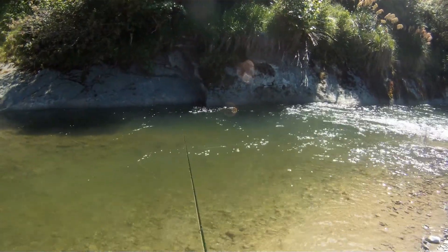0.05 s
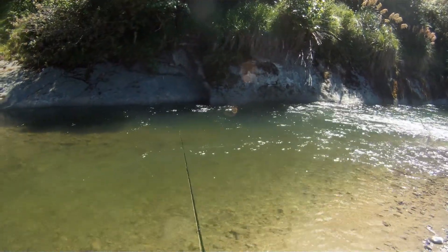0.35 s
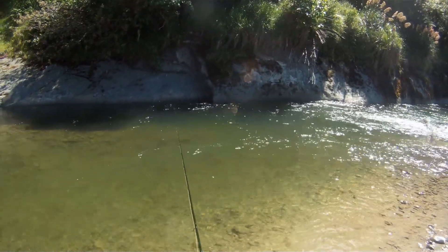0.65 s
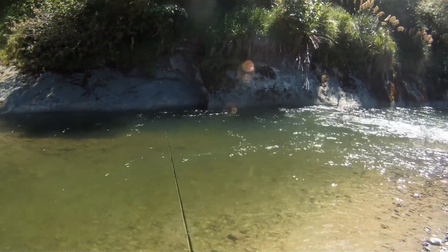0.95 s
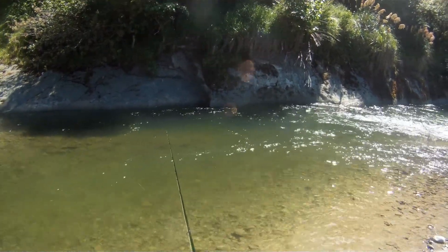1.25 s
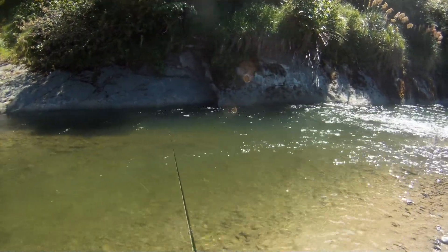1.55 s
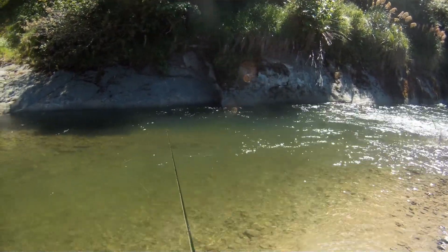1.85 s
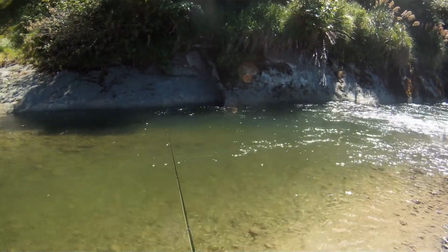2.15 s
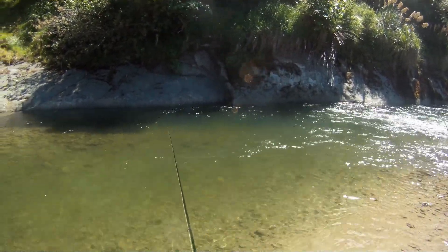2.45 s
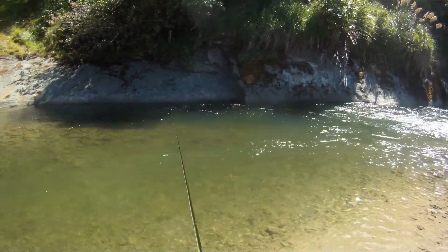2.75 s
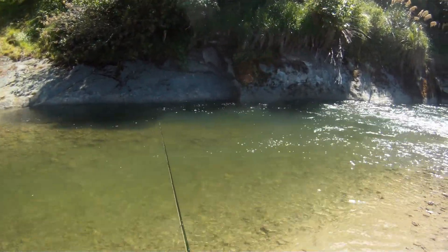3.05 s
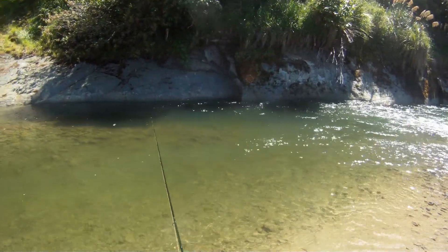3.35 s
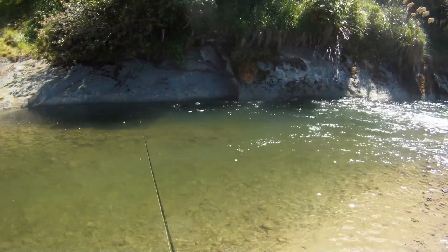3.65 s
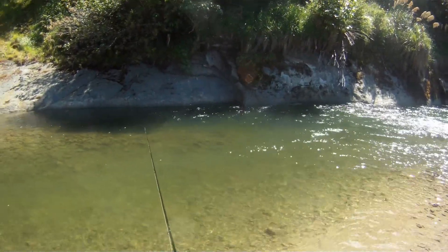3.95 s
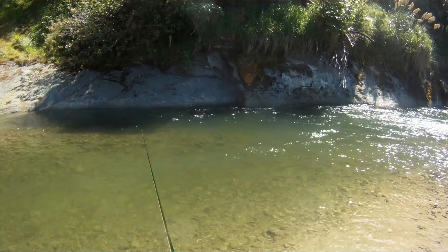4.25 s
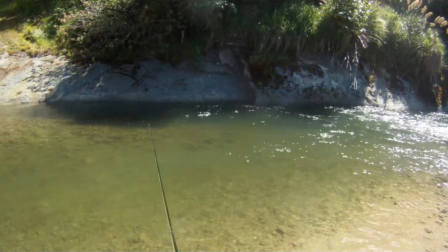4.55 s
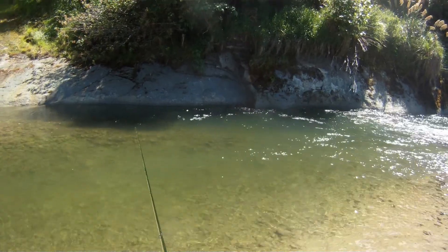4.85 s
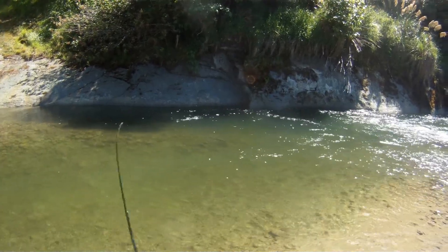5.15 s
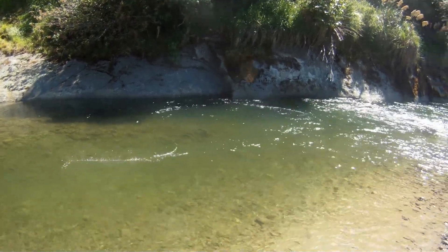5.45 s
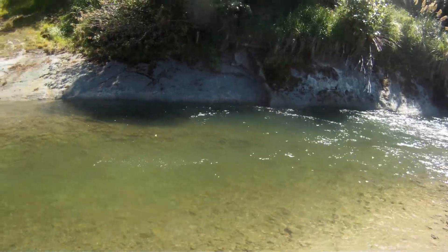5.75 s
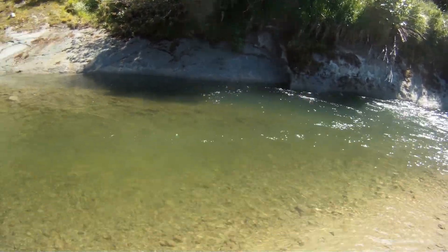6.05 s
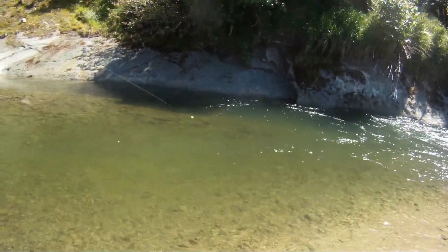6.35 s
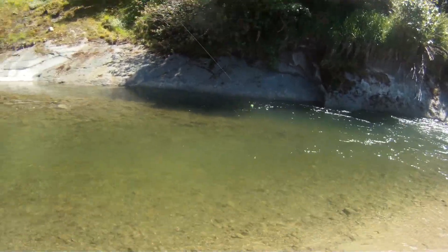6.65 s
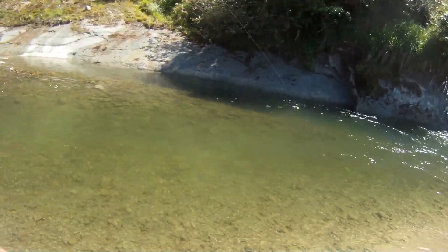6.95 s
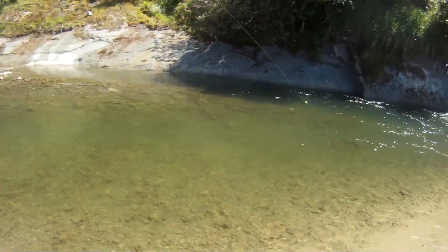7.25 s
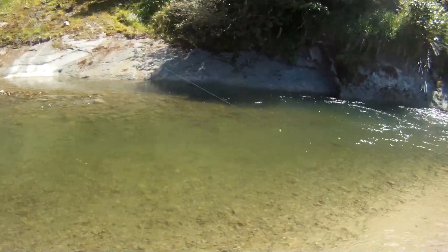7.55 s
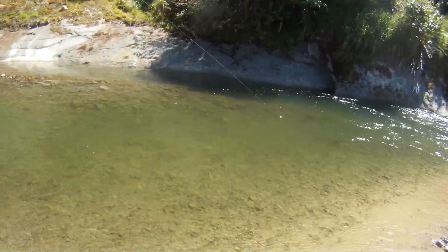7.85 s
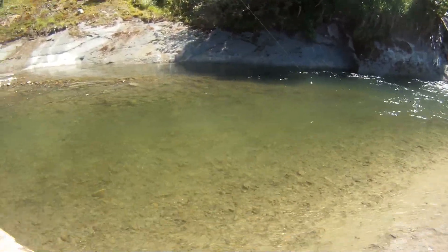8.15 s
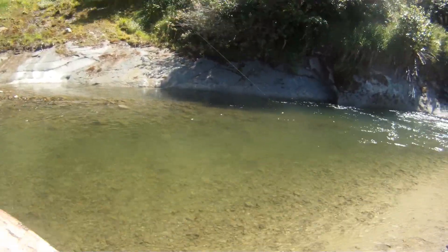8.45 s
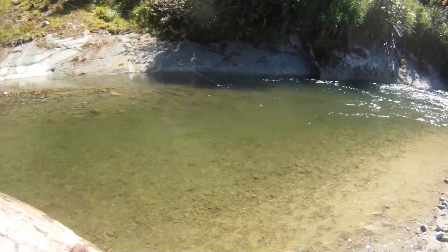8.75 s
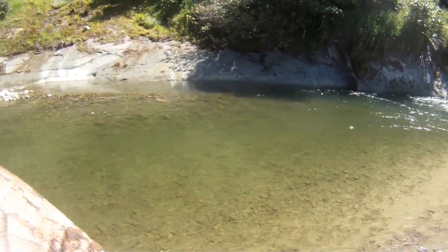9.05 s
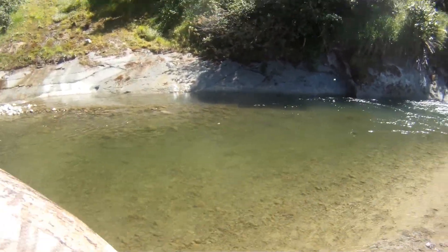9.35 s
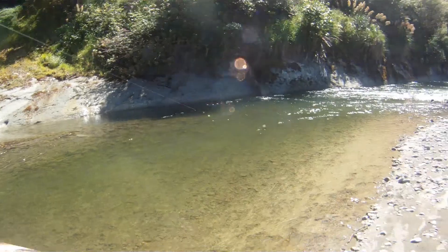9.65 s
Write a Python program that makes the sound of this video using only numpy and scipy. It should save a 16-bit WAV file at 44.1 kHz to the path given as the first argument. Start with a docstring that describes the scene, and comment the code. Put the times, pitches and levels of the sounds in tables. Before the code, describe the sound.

A river rushes faintly and steadily, with a few lone ticks, heard through a small camera strapped to an angler. About halfway through, a fishing line swishes softly and lands with a tiny plip. Steps along the gravel bank follow, shaking the mount: close plastic knocks and rattles, strap rubbing and deep thumps stand out over light crunches of grit. The treble has a thin, slightly gritty edge.

```python
"""A river rushes faintly, with a few lone ticks, heard through a small camera strapped to an angler.
The angler shifts stance, then casts: the line swishes through the air and lands with a tiny plip.
Wading steps along the gravel bank follow. They shake the camera's mount, whose plastic parts knock
and rub, and grit crunches underfoot. The camera samples the sound coarsely and holds each sample,
which gives every sound a thin mirror image in the treble."""
import sys
import numpy as np
from scipy import signal
from scipy.fft import rfft, irfft
from scipy.io import wavfile
from scipy.ndimage import uniform_filter1d

SR = 44100
rng = np.random.default_rng(int(sys.argv[2]) if len(sys.argv) > 2 else 0)


def store_wav(level_fs):
    """Save 16-bit WAV to argv[1]."""
    pcm = np.round(np.clip(np.atleast_2d(level_fs), -1, 1) * 32767)
    wavfile.write(sys.argv[1], SR, pcm.T.astype(np.int16))


N = 436149
TIME = np.arange(N) / SR

# the tone of the rapids inside the camera's case: (frequency [Hz], relative level [dB])
RIVER_TONE = [(20, 2), (32, 13.5), (55, 6), (110, 5), (200, 2.5), (400, -2.5), (750, -5), (1200, -8.5),
              (2000, -4), (2800, -3.5), (3200, -10.5), (4000, -13.5), (5000, -16.5), (6000, -20)]
# pitches that the air in the case boosts: (frequency [Hz], width [Hz], boost [dB])
AIR_RESONANCES = [(950, 300, 3), (1470, 376, 7.5), (1946, 100, 4.5), (2480, 410, 5), (2910, 150, 6.5),
                  (3620, 640, 4)]
# faint, sharp ticks: (time [s], relative level [dB])
LONE_TICKS = [(1.037, -42), (3.347, -42), (5.037, -43), (7.036, -42), (9.347, -43.5)]
# jolts of the body - two shifts of stance, the cast, then seven steps:
# (time [s], peak level [dB], swing rate [Hz], time to the widest swing [s], strap scuff level [dB])
BODY_JOLTS = [(2.695, -46, 54.5, 0.021, -78), (2.771, -41, 35.2, 0.019, -80),
              (5.227, -44.5, 60, 0.012, -79), (5.917, -31, 24.2, 0.02, -72),
              (6.519, -34.5, 27.5, 0.053, -49.5), (7.587, -22, 25.2, 0.05, -52.5),
              (8.141, -15.5, 25.8, 0.029, -57), (8.604, -18.5, 33.6, .024, -57),
              (9.169, -22.5, 28.4, 0.048, -60), (9.681, -40, 26.8, 0.05, -58)]
# how much the moving body sways the mount, from the cast on: (time [s], relative level [dB])
BODY_MOTION = [(5.25, -51), (5.49, -52), (6.44, -47.5), (6.54, -45.5), (6.66, -48), (7.01, -48.5),
               (7.2, -40), (7.34, -45.5), (8.03, -50.5), (8.3, -45), (8.61, -45), (8.76, -45.5),
               (8.92, -53.5), (9.07, -50.5), (9.4, -47.5), (9.89, -47.5)]
# the tone of the swaying mount: (frequency [Hz], relative level [dB])
SWAY_TONE = [(15, -12.5), (24, -12.5), (31, 2.5), (42, -11.5), (60, -15.5), (100, -44), (200, -80)]
# the tone of the rumbling strap: (frequency [Hz], relative level [dB])
STRAP_TONE = [(30, -36), (60, 12), (100, 1), (145, 2.5), (200, -16.5), (300, -12.5), (500, -20),
              (900, -37.5)]
# the notes at which the plastic case rings:
# (frequency [Hz], width [Hz], relative level [dB], change when hit at a panel's centre [dB])
CASE_NOTES = [(270, 300, -17.5, 25), (646, 67, -1.5, -10), (780.6, 108, 0.5, -15), (904, 200, 0.5, 11.5),
              (1152, 650, -8.5, -3.5), (1762, 270, -10.5, -8), (1952, 320, -2.5, -10),
              (2206, 170, -2.5, 3.5), (2693, 223, -1, 4), (3490, 150, -17.5, -13), (3747, 80, -18.5, -16),
              (4330, 740, -25, -10.5), (5490, 380, -29, -13.5)]
# clear knocks in the mount; harder ones sound brighter:
# (time [s], relative ring level [dB], hardness [dB], spot hit [-1 corner to 1 panel centre])
MOUNT_KNOCKS = [(2.703, -58, -22, .17), (6.006, -32, 2, 0.35), (6.037, -40.5, -11, 0),
                (6.36, -35, -4, 0.067), (6.477, -46.5, -18, -0.028), (6.504, -45.5, -18, 0.29),
                          (6.613, -42.5, -7, -.1), (6.6611, -30, 2, -0.47), (7.079, -33.5, -5, -0.081),
                (7.123, -41.5, -19, 0.085), (7.152, -30, -1.5, -0.27), (7.257, -50, -8, 0),
                (7.3072, -30, -1.5, -0.3), (7.465, -46, -22, -.17), (7.549, -44, -12, 0.18),
                (7.602, -39.5, -15, 0.26), (7.626, -41, -10, .05), (7.6557, -32, 5, -0.46),
                (8.021, -31.5, -7, 0.1), (8.15, -42.5, -6, -.3), (8.187, -47, -9, 0.13),
                (8.351, -49.5, -22, -0.051), (8.516, -42, -12, .05), (8.6143, -24.5, 1.5, -0.4),
                (8.637, -40, -4.5, 0.36), (8.727, -40, -7.5, 0.059), (8.825, -45, -13, 0.11),
                (8.979, -30.5, -9.5, -0.069), (9.056, -30.5, -13, 0.018), (9.188, -32.5, -6, 0.076),
                (9.206, -27, 2.5, -0.45), (9.245, -42.5, -11, 0.046), (9.528, -48, -24, -0.15),
                (9.694, -43, -18, -0.12)]
# the loudest stones grinding under a boot: (time [s], relative level [dB])
BOOT_CRUNCHES = [(6.0347, -46.5), (6.7263, -37.5), (7.6702, -38), (7.6992, -43), (7.737, -47.5),
                 (8.2187, -57), (8.6274, -41), (8.6477, -40), (8.723, -42.5), (8.736, -40), (8.875, -43.5),
                 (8.9487, -45), (9.2965, -46), (9.748, -47.5)]
# the jolts that are steps: (time [s], peak level [dB])
STEPS = [(s, db) for s, db, *_ in BODY_JOLTS if s > 5.8]

# Tugs, rattles and grit are set for a firm step. Their "follows" is dB gained per dB of stronger jolt.
FIRM_STEP_DB = -21.5


def from_db(db):
    """Turn decibels into a number to multiply a sound by."""
    return 10 ** (np.asarray(db) / 20)


def rms_one(x):
    """Scale a sound so that its average strength (rms) is 1."""
    return x / np.sqrt(np.mean(x ** 2) + 1e-20)


def add(out, s, sound):
    """Mix a sound into out, starting at s seconds."""
    start = min(round(s * SR), N)
    out[start:start + len(sound)] += sound[:N - start]


def drift(rate_hz):
    """A curve that wanders at random around zero."""
    points = rng.standard_normal(2000)
    return np.interp(TIME * rate_hz, np.arange(len(points)), points)


def swell(t, rise_s):
    """A curve that starts at time 0, rises to 1 at rise_s, then dies away."""
    progress = np.maximum(t, 0) / rise_s
    return progress * np.exp(1 - progress)


def noise(tone, resonances=()):
    """Noise with the given tone, boosted around each resonance."""
    hz = np.maximum(np.arange(N // 2 + 1) * SR / N, 1)
    tone_hz, tone_db = np.transpose(tone)
    db = np.interp(np.log(hz), np.log(tone_hz), tone_db)
    for centre, width, boost in resonances:
        db += boost / (1 + (2 * (hz - centre) / width) ** 2) ** 2
    return rms_one(irfft(rfft(rng.standard_normal(N)) * from_db(db), N))


def band(low_hz, high_hz):
    """A filter that keeps what lies between two frequencies."""
    return signal.butter(2, [low_hz, high_hz], "band", fs=SR, output="sos")


def river(level_db=-56.5, surge_db=0.4, burble_db=0.94):
    """Distant white water: a smooth rush whose middle range burbles a little."""
    rush = noise(RIVER_TONE, AIR_RESONANCES)
    middle = signal.sosfiltfilt(band(900, 3500), rush)
    loudness = from_db(level_db + surge_db * drift(2.5))
    burble = middle * (from_db(burble_db * drift(60)) - 1)
    return loudness * (rush + burble)


def ticks(gain_db=12.5, tail_s=0.00025):
    """Lone ticks, each a sharp spike with a tiny dull tail."""
    out, t = np.zeros(N), np.arange(SR // 200) / SR
    shape = (t == 0) + 0.35 * np.exp(-t / tail_s)
    for s, db in LONE_TICKS:
        add(out, s, -from_db(db + gain_db) * shape)
    return out


def mount_sway(sway_db, gain_db=4.0):
    """The camera sways on its mount; after each jolt a deep swing grows and dies away."""
    sway = noise(SWAY_TONE)
    strength = np.sqrt(uniform_filter1d(sway ** 2, SR // 8) + 1e-6)
    out = from_db(sway_db + gain_db) * rms_one(sway / strength)  # dividing evens out the noise
    t = np.arange(SR) / SR
    for s, db, swing_hz, rise_s, _ in BODY_JOLTS:
        add(out, s, from_db(db) * swell(t, rise_s) ** 1.48 * np.sin(2 * np.pi * swing_hz * t))
    return out


def strap(sway_db, tug_db=-54, follows=0.7, tug_rise_s=0.053, scuff_lag_s=0.061, scuff_width_s=0.065):
    """The strap rumbles and creeps as the body moves; each jolt tugs it and makes it slide and scuff."""
    tugs, scuffs = np.zeros(N), np.zeros(N)
    for s, db, _, _, scuff_db in BODY_JOLTS:
        tugs += from_db(tug_db + follows * (db - FIRM_STEP_DB)) * swell(TIME - s, tug_rise_s)
        scuffs += from_db(scuff_db) * np.exp(-((TIME - s - scuff_lag_s) / scuff_width_s) ** 2)
    rumble = noise(STRAP_TONE)
    creep = from_db(-10) * rubbing(slips_per_s=150, hardness_db=-13)
    slide = rubbing(slips_per_s=700, hardness_db=-6)
    movement = np.hypot(from_db(sway_db - 12), tugs)
    return movement * (rumble + creep) + scuffs * slide


def rubbing(slips_per_s, hardness_db):
    """Rubbing is many small slips, each one tapping the case."""
    slips = (rng.random(N) < slips_per_s / SR) * rng.standard_normal(N)
    return rms_one(signal.fftconvolve(slips, case_ring(hardness_db))[:N])


def case_ring(hardness_db, spot=0, rise_s=0.0011, touch_s=0.0012, low_hz=900, high_hz=2000):
    """One tap on the case: the spot hit sets the mix of notes, and a soft tap leaves high ones quiet."""
    t = np.arange(int(.06 * SR)) / SR
    hz, width, db, centre_db = np.array(CASE_NOTES).T[:, :, None]
    chance = rng.standard_normal((3, len(CASE_NOTES), 1))
    chance_db, phase, detune = 1.6 * chance[0], .5 * chance[1], .007 * chance[2]
    fade = (1 - np.exp(-t / rise_s)) ** 2 * np.exp(-np.pi * width * t)  # wider notes die sooner
    # the parts stay in touch for a moment, so the ring builds up before it dies
    fade = signal.lfilter(np.ones(int(touch_s * SR)), [1], fade, axis=1)
    fade /= fade.sum(axis=1, keepdims=True)
    waves = np.sin(2 * np.pi * hz * (1 + detune) * t + phase)
    notes = from_db(db + spot * centre_db + chance_db) * fade * waves
    highness = np.clip(np.log(hz / low_hz) / np.log(high_hz / low_hz), 0, 1.25)
    return (notes * from_db(hardness_db * highness)).sum(axis=0) / np.sqrt(np.sum(notes ** 2))


def knocks(ring_gain_db=30, medium_ring_db=-39.5, thud_hz=140, thud_rise_s=0.0026):
    """The loose mount hits its stop as the body rocks: the case rings over a short, dull thud."""
    out, t = np.zeros(N), np.arange(SR // 20) / SR
    hits = []
    for s, ring_db, hardness_db, spot in MOUNT_KNOCKS:
        # the thud grows more slowly than the ring, and is strongest at a panel's centre
        thud_db = -36.5 + 0.33 * (ring_db - medium_ring_db) + 5.5 * spot
        hits.append((s, ring_db, hardness_db, spot, thud_db))
    for s, ring_db, hardness_db, spot, thud_db in hits + rattles():
        add(out, s - .0005, from_db(ring_db + ring_gain_db) * case_ring(hardness_db, spot))
        pitch_hz = thud_hz * rng.uniform(0.81, 1.07)
        thud = swell(t, thud_rise_s) * np.sin(2 * np.pi * pitch_hz * t)
        add(out, s - .001, from_db(thud_db) * thud)
    return out


def line_swish(level_db=-69, peak_s=5.39, width_s=0.055):
    """The fishing line cuts the air with a brief hiss."""
    hiss = rms_one(signal.sosfilt(band(3300, 5600), rng.standard_normal(N)))
    return from_db(level_db) * np.exp(-((TIME - peak_s) / width_s) ** 2) * hiss


def line_plip(level_db=-52, start_s=5.582, pitch_hz=2700, fade_s=0.086):
    """The line lands on the water with a tiny, quickly fading note."""
    t = np.maximum(TIME - start_s, 0)
    return from_db(level_db - 60 * np.minimum(t / fade_s, 2)) * np.sin(2 * np.pi * pitch_hz * t)


def gravel(gain_db=2, decay_s=0.0043, grains_per_s=4000):
    """Stones grind under a boot: each crunch is a quick burst of tiny clicks."""
    out, t = np.zeros(N), np.arange(SR // 25) / SR
    for s, db in BOOT_CRUNCHES + grit():
        grains = (rng.random(len(t)) < grains_per_s / SR) * rng.standard_normal(len(t))
        burst = signal.sosfilt(band(1900, 4400), grains * np.sqrt(t) * np.exp(-t / decay_s))
        add(out, s - .001, from_db(db + gain_db) * burst / np.abs(burst).max())
    return out


def grit(count=3, base_db=-51, follows=0.33, settle_s=0.14):
    """Small stones give way at random after each step: (time [s], relative level [dB])."""
    return [(s + settle_s * late, base_db + follows * (db - FIRM_STEP_DB))
            for s, db in STEPS for late in rng.random(count)]


def rattles(count=3, gap_s=0.085, follows=0.15, loss_db=1, ring_db=-52, hardness_db=-15, thud_db=-42):
    """The mount settles after each step in ever softer taps, listed here for knocks() to play."""
    taps = []
    for s, db in STEPS:
        for k, (late, spot) in enumerate(rng.uniform(-.25, .25, (count, 2))):
            tap_s = s + gap_s * (k + 1 + late)
            change_db = follows * (db - FIRM_STEP_DB) - loss_db * k
            taps.append((tap_s, ring_db + change_db, hardness_db, spot, thud_db + change_db))
    return taps


def scene(standing_db=-66, still_db=-90):
    """Mix the river, the cast and the steps; the body is almost still until its first jolt."""
    sway_db = np.interp(TIME, *np.transpose(BODY_MOTION), left=standing_db)
    sway_db[TIME < BODY_JOLTS[0][0]] = still_db
    sway_db = uniform_filter1d(sway_db, SR // 30)  # smooth out sudden jumps
    mix = river() + ticks() + knocks() + strap(sway_db) + mount_sway(sway_db)
    mix += gravel() + line_swish() + line_plip()
    return mix[None]


def record(dry, sampler_hz=12000, cutoff_hz=15200):
    """The camera holds each coarse sample, which mirrors the sound into the treble; the top is cut."""
    smooth = signal.sosfilt(signal.butter(10, 5750, fs=SR, output="sos"), dry)
    coarse = signal.resample_poly(smooth, sampler_hz, SR, axis=1)
    stairs = np.repeat(coarse, 4, axis=1)
    held = signal.resample_poly(stairs, SR, 4 * sampler_hz, axis=1)[:, :N]
    return signal.sosfilt(signal.ellip(8, .3, 70, cutoff_hz, fs=SR, output="sos"), held)


dry = scene()
out = record(dry)
store_wav(out)
```